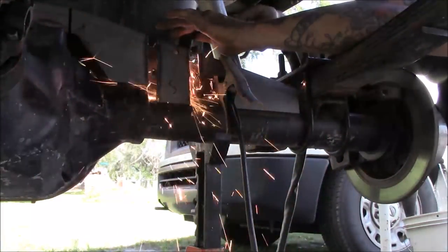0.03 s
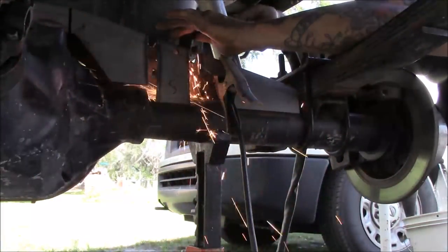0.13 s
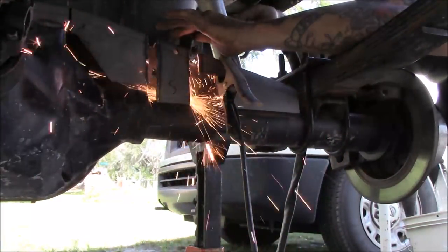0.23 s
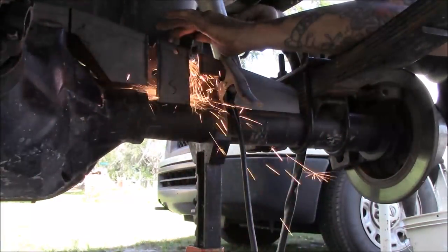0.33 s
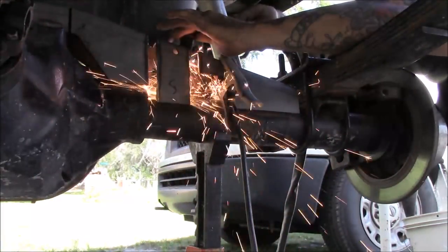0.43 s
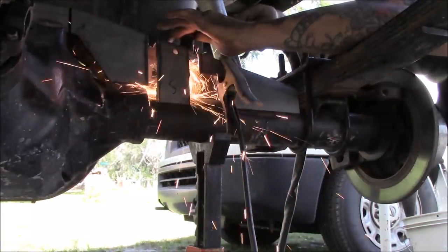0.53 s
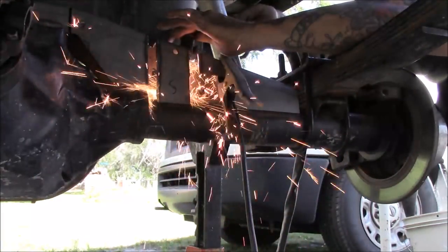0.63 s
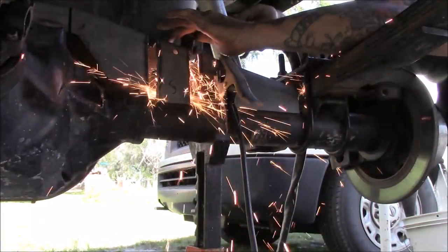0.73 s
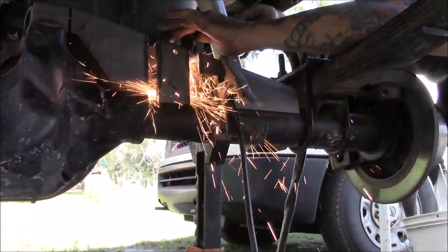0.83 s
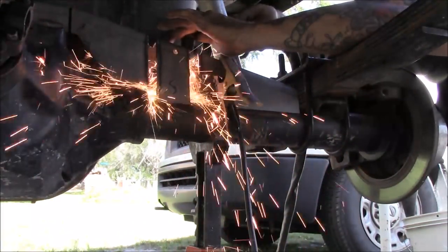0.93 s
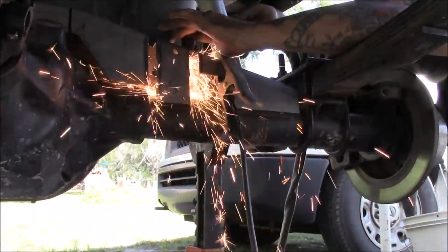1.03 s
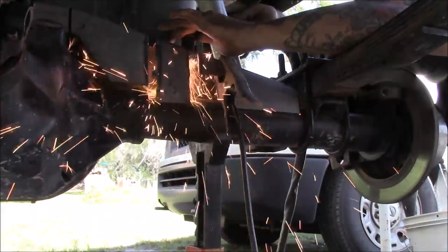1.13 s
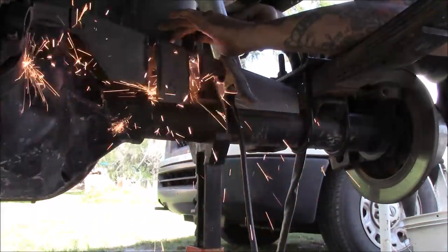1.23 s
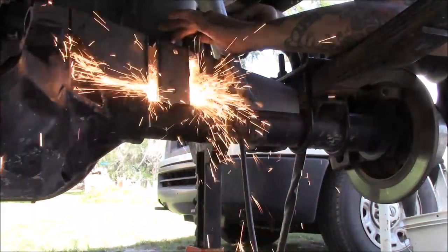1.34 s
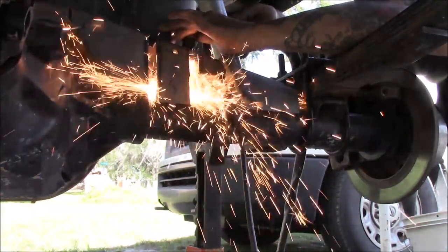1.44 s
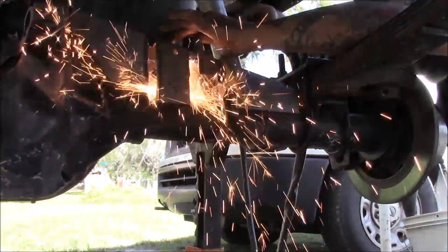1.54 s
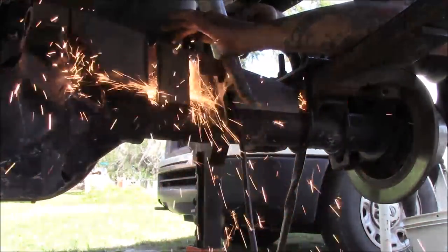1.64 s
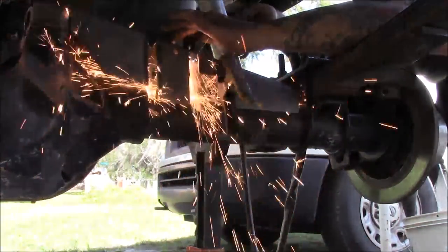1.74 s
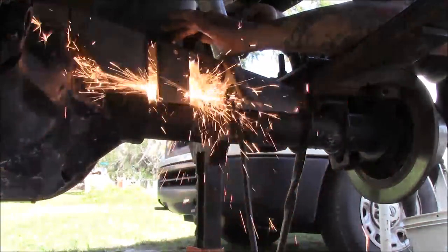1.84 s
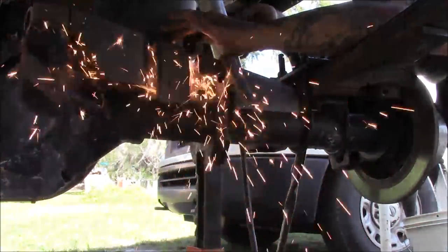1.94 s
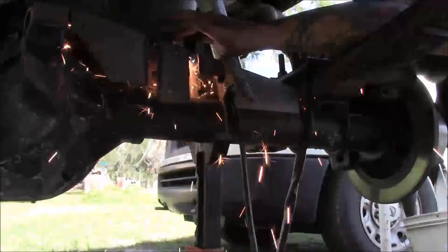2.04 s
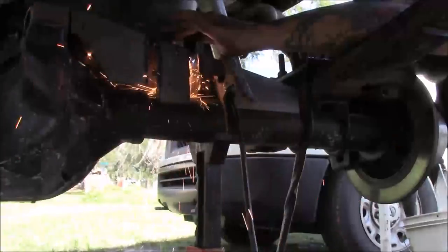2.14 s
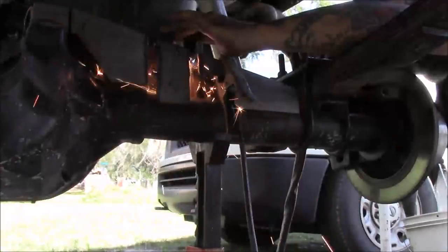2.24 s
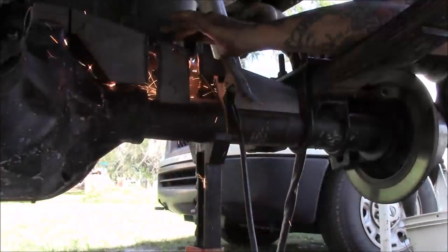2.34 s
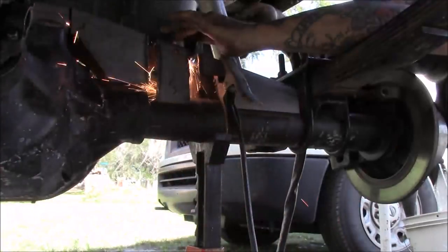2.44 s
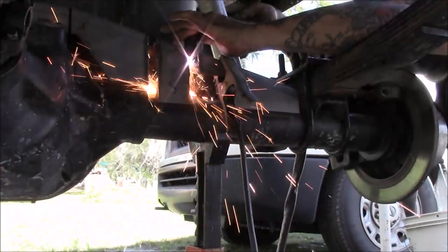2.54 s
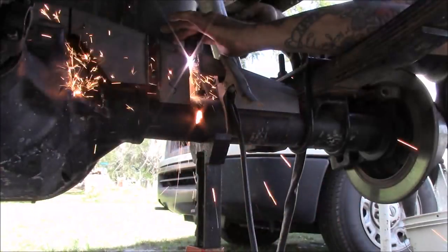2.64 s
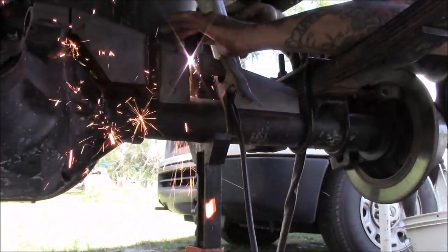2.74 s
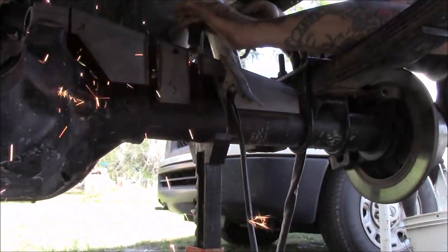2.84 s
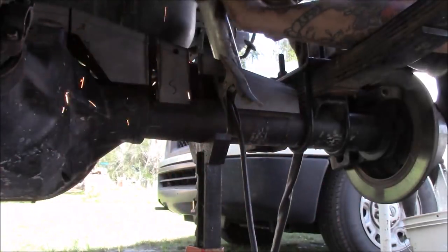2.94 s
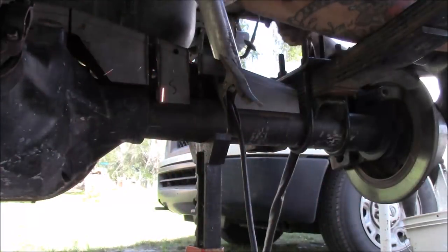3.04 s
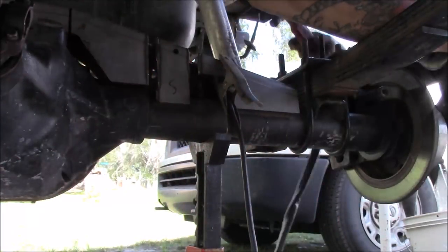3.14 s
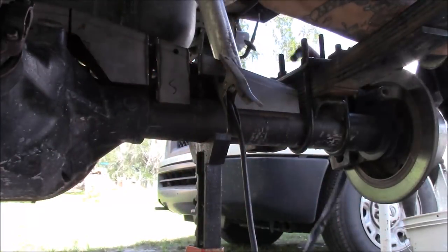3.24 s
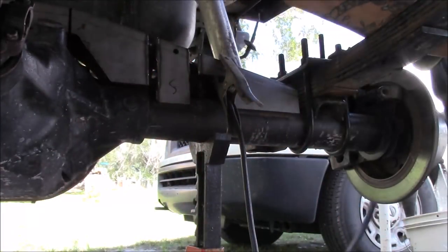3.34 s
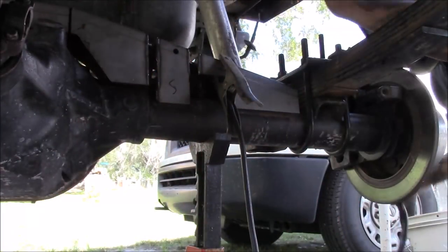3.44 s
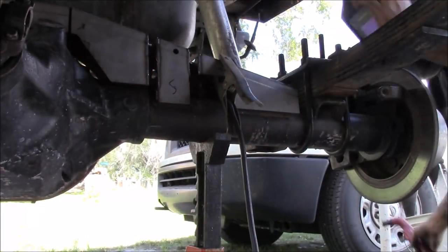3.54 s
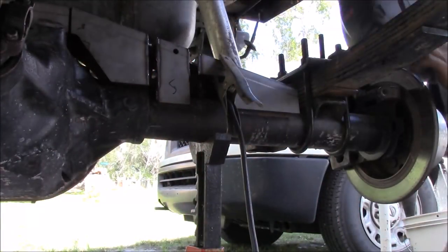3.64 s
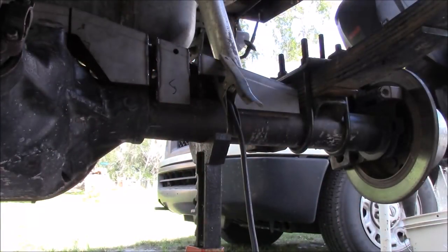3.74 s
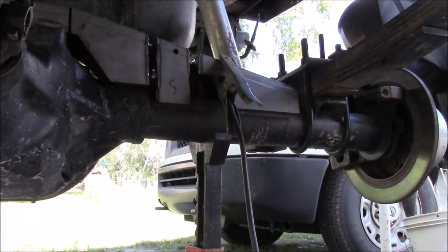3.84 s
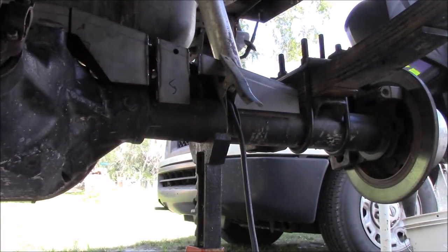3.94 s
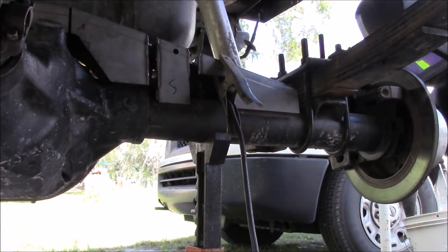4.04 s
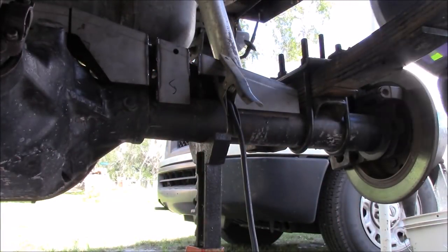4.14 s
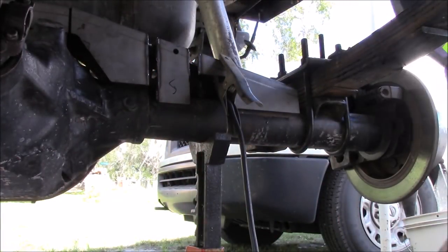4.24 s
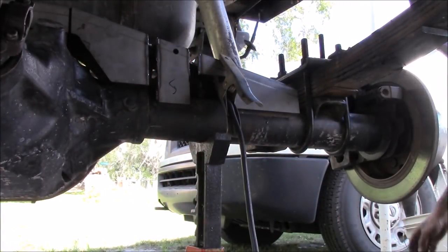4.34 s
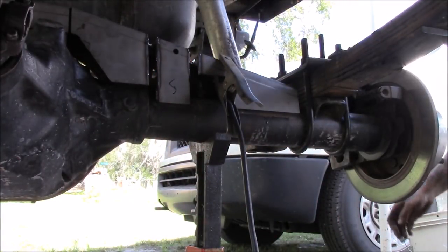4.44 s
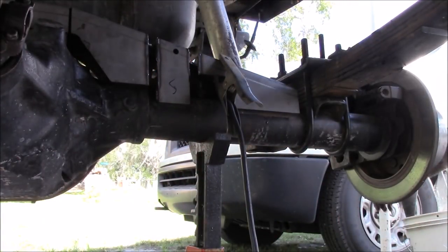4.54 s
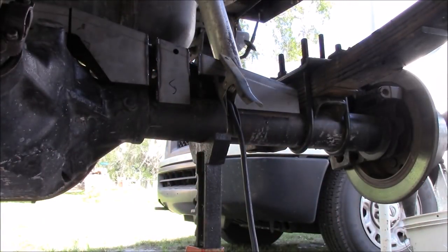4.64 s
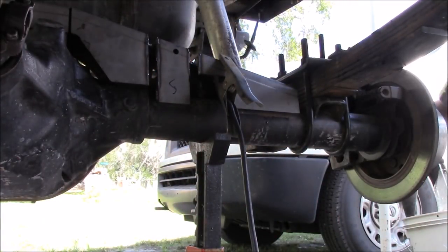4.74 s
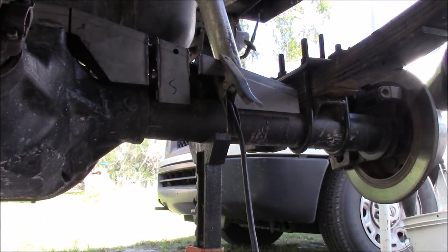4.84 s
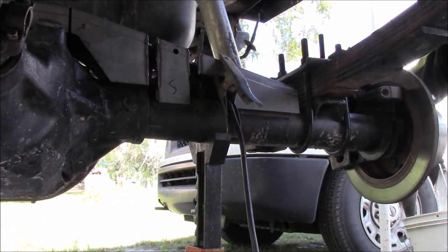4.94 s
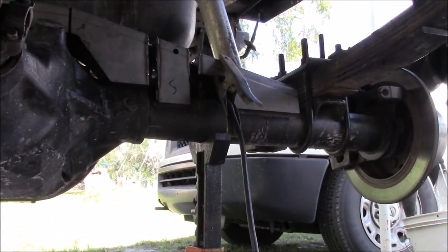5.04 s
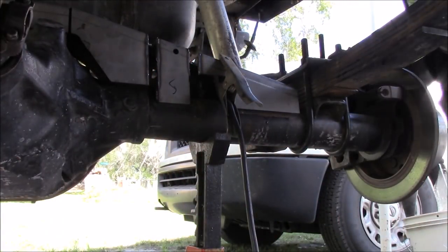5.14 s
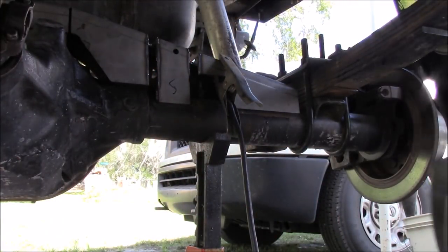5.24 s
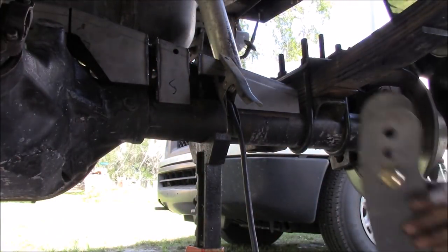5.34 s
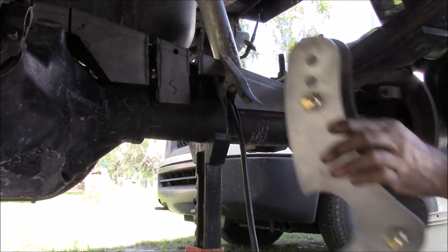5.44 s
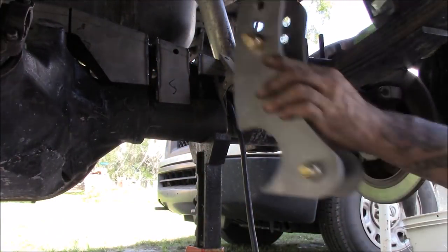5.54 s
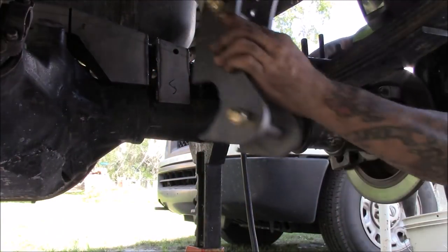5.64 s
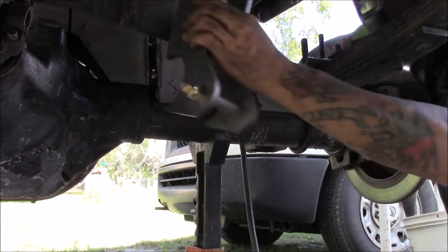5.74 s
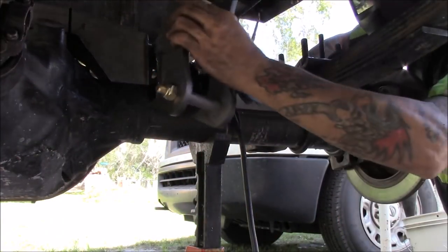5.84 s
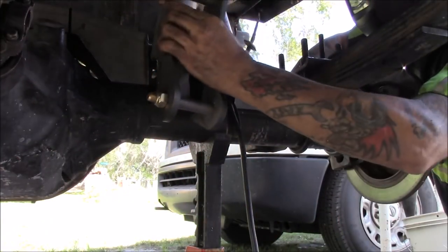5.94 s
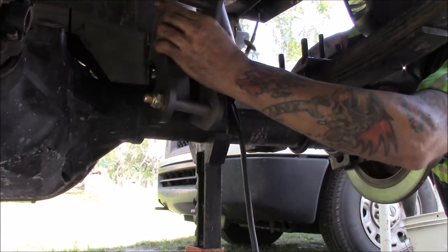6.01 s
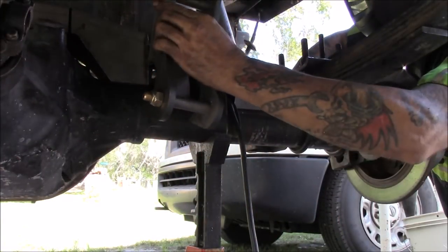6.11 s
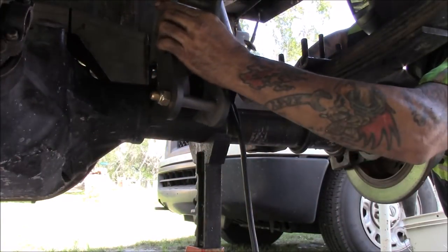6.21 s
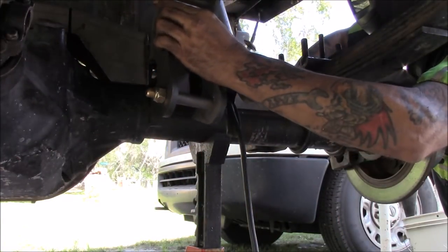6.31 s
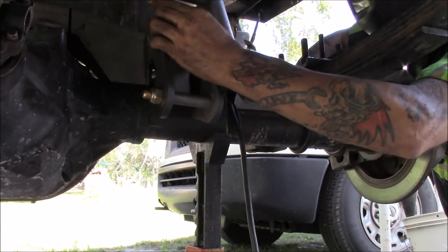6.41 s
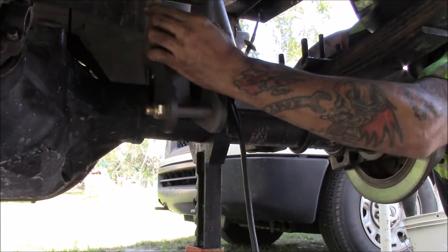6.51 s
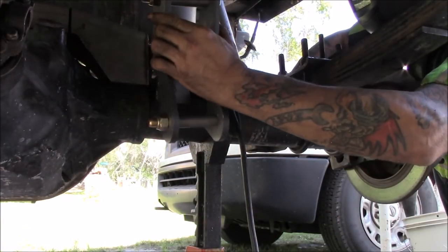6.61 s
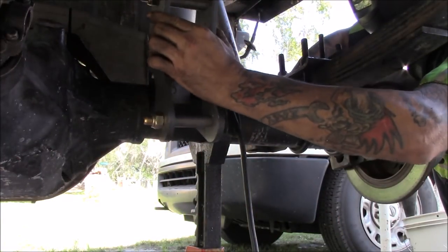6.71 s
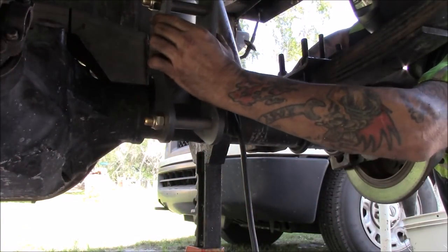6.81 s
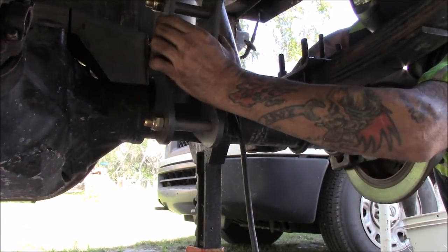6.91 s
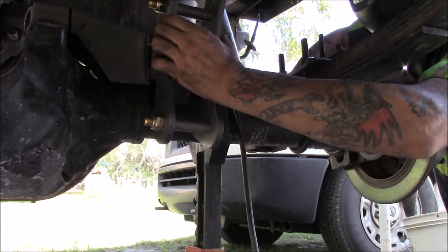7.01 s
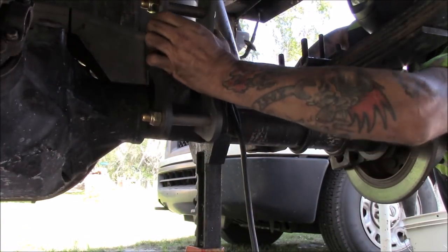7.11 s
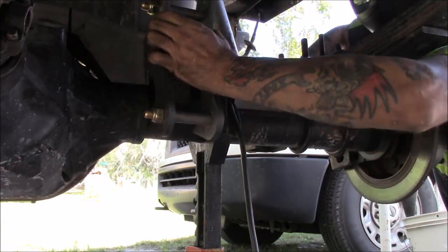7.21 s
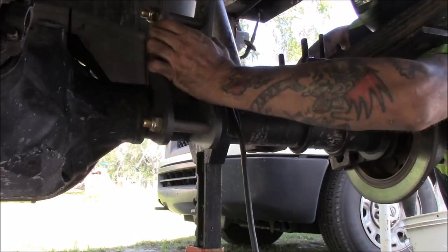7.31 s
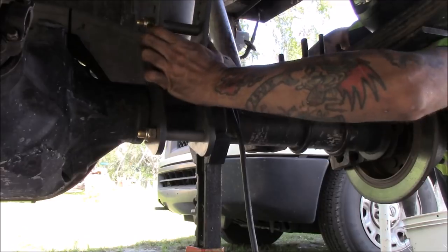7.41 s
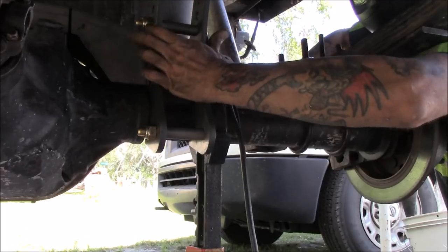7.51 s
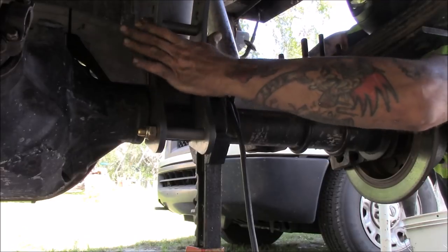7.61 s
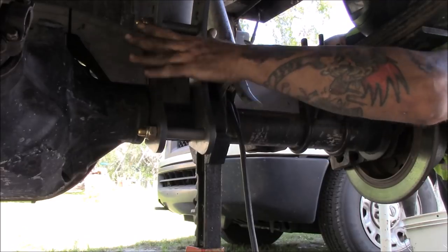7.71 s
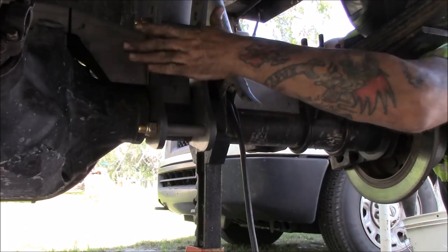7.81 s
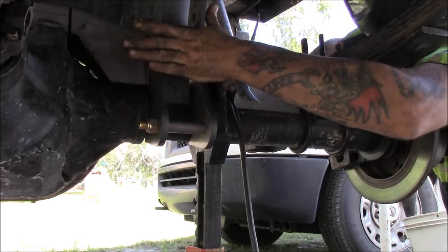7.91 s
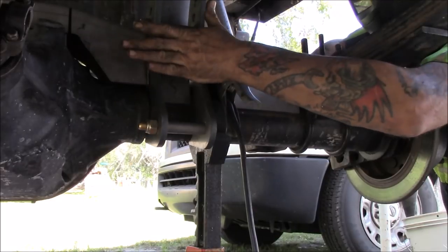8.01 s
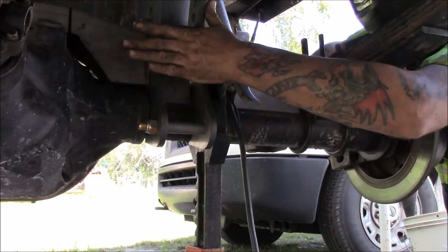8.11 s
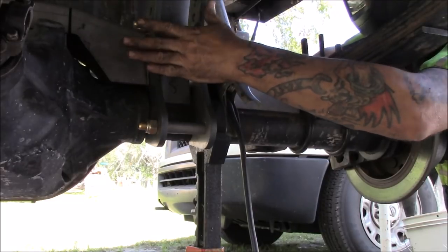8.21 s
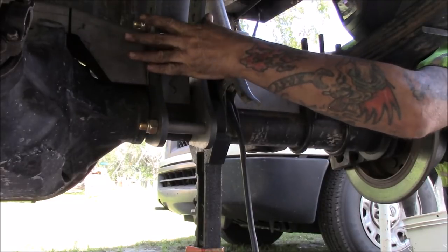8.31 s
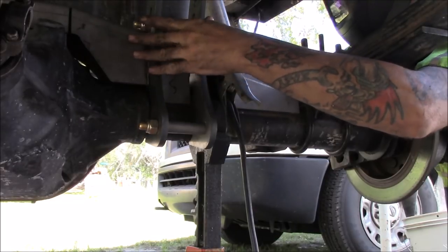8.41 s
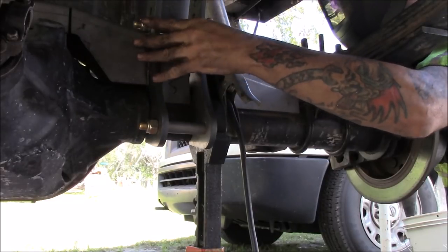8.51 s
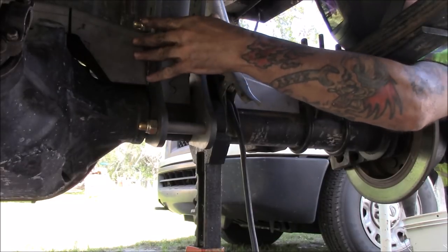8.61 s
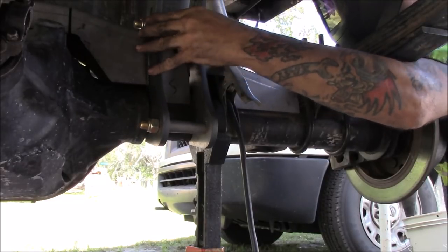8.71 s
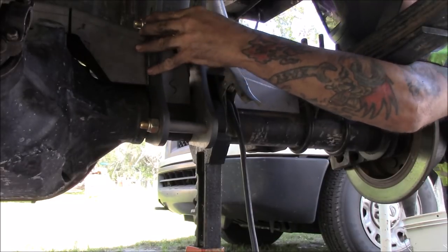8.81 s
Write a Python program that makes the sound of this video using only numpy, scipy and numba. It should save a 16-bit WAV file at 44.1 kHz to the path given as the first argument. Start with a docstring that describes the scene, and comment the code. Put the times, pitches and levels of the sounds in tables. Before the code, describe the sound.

Fierce crackling arc sizzle stops with a short pop, leaving airy hissing gas, followed by hard metallic knocks and scrapes beneath a truck.

```python
"""Arc torch and steel plate under a truck

Close by, an arc torch sizzles on a steel axle housing: noise and droplet bursts in resonant air.
It goes out with a short pop; its gas, flickering noise with a sweeping reflection, hisses on.
The nozzle drags and clinks over the steel, then the torch is laid on the ground.
A heavy steel plate is knocked into place against a bracket: decaying modes, cracks and clatter.
The camera's limiter ducks everything wherever the sum passes full scale."""
import sys
import numpy as np
from scipy import signal
from scipy.fft import rfft, irfft, next_fast_len
from scipy.io import wavfile
from scipy.ndimage import uniform_filter1d, minimum_filter1d
from numba import njit

SR = 44100
rng = np.random.default_rng(int(sys.argv[2]) if len(sys.argv) > 2 else 0)


def log_audio(samples):
    """Write samples as a 16-bit WAV file to the path given in sys.argv[1]."""
    # one column per channel
    frames = np.atleast_2d(samples).T
    # limit to full scale, then quantise
    limited = np.clip(frames, -1, 1)
    pcm = np.round(limited * 32767).astype(np.int16)
    wavfile.write(sys.argv[1], SR, pcm)


N = 390714
TIME = np.arange(N) / SR  # s
RING_SIZE = 22050  # samples in one ring, half a second
ARC_OUT_S, ARC_FADE_S = 2.811, 0.0093

# air resonances between torch, bracket and axle tube: (centre [Hz], width [Hz], lift [dB])
AIR_CAVITY = [(800, 75, 6), (1380, 134, 14.5), (1526, 62, 8), (2190, 85, 8), (2690, 230, 6.5),
              (2976, 210, 9), (4570, 160, 5), (5110, 120, 3.5), (6400, 200, 1.5), (7250, 270, 4),
              (7920, 110, 2.5), (8830, 210, 6.5), (9020, 150, -8), (10420, 160, 2), (11070, 140, 1.5)]


def undb(db):
    """Decibels to an amplitude factor."""
    return 10 ** (np.asarray(db) / 20)


def unit(x):
    """Scale to an RMS of 1."""
    return x / np.sqrt(np.mean(x ** 2))


def curves(table):
    """The columns of a table, joined by straight lines in time."""
    s, *columns = np.transpose(table)
    return [np.interp(TIME, s, c) for c in columns]


def add(out, start_s, x):
    """Mix x into out at a given time."""
    i = int(start_s * SR)
    out[i:i + len(x)] += x[:max(len(out) - i, 0)]


def hump(at_s, half_s):
    """A smooth rise to 1 and back."""
    return np.exp(-((TIME - at_s) / half_s) ** 2)


def ease(at_s, ease_s):
    """A smooth step from 0 to 1."""
    return .5 + .5 * np.tanh((TIME - at_s) / (2 * ease_s))


def walk(rate, size=N):
    """Random wander: normal draws, rate of them a second, joined by straight lines."""
    knots = rng.standard_normal(8192)
    return np.interp(TIME[:size] * rate, np.arange(len(knots)), knots)


def colour(x, points, resonances=()):
    """Filter by a (Hz, dB) outline with resonant humps or dips on top."""
    size = next_fast_len(len(x))
    f = np.fft.rfftfreq(size, 1 / SR) + 1  # 1 Hz up, to keep the logarithm finite
    hz, db = np.transpose(points)
    gain_db = np.interp(np.log(f), np.log(hz), db)
    for centre, width, lift in resonances:
        gain_db = gain_db + lift / (1 + (2 * (f - centre) / width) ** 2)
    return irfft(rfft(x, size) * undb(gain_db), size)[:len(x)]


def band(x, lo_hz, hi_hz, order=3):
    """Band-pass."""
    edges = [lo_hz, min(hi_hz, SR / 2 - 1000)]
    return signal.sosfilt(signal.butter(order, edges, "band", fs=SR, output="sos"), x)


def echo(x, lag_ms):
    """A reflection whose path may change."""
    return np.interp(TIME - lag_ms / 1000, TIME, x)


def jet(x, mid_db, low_db, top_db, flutter_db):
    """Split a jet into large, middle and fine eddies, each with its own level and flutter."""
    size = next_fast_len(N)
    spectrum = rfft(x, size)
    f = np.fft.rfftfreq(size, 1 / SR)
    low = 1 / (1 + (f / 3900) ** 8)
    top = 1 - 1 / (1 + (f / 11800) ** 20)
    out = 0
    for share, db in ((low, low_db), (1 - low - top, mid_db), (top, top_db)):
        eddies = unit(irfft(spectrum * share, size)[:N])
        out = out + eddies * undb(db + flutter_db * walk(45))
    return out


def ring(modes, scatter_db=4.0, rise_s=0.00073, detune_hz=3):
    """Decaying modes; grip and contact shift their strength and pitch a little from blow to blow."""
    t = TIME[:RING_SIZE]
    out = 0
    for hz, db, t60 in modes:
        pitch_hz = hz + detune_hz * rng.standard_normal()
        wave = np.sin(2 * np.pi * (pitch_hz * t + rng.random()))
        strength = undb(db + scatter_db * rng.standard_normal())
        out = out + strength * wave * np.exp(-np.log(1000) * t / t60)
    return out * (1 - np.exp(-t / rise_s))


def arc_levels():
    """Sizzle, roar and fizz in dB: all three swell with each surge of molten steel."""
    # surges as molten steel is blown out:
    # (time [s], half length [s], swell [dB], extra fizz [dB], extra roar [dB])
    surges = [(.06, .15, 1.3, 2.2, -1), (.36, .1, 1.3, 1, 2), (.66, .12, 1.7, 1.5, 1.2),
              (.86, .1, 2.4, 1.5, -.5), (1.24, 0.096, 2, .5, -1), (1.44, .13, 4.7, 1.3, 1.2),
              (1.59, .04, 1.4, 1, 1.2), (2.125, .17, 1.6, 3, .6), (2.652, .06, 2.4, 6, 1.8)]
    sizzle_db, roar_db, fizz_db = -20.2, -27.4, -26.4  # between the surges
    swell, spray, roar = sum(np.outer(lifts_db, hump(s, half_s)) for s, half_s, *lifts_db in surges)
    return sizzle_db + swell, roar_db + swell + roar, fizz_db + swell + spray


def steel_faces(x):
    """Many near reflections comb the hiss; the combs drift as the hand moves the torch."""
    lags_ms = np.linspace(1.8, 9, 12) + rng.uniform(-.3, .3, 12)
    return x + .17 * sum(echo(x, lag_ms + .035 * walk(1.3)) for lag_ms in lags_ms)


def arc(spatter_per_s=2600, spatter_db=-6, spread_db=2.0, sputter_db=0.5):
    """Turbulent gas and bursting metal droplets sound in the steel corner until the arc goes out."""
    # colour of the arc: (frequency [Hz], level [dB])
    outline = [(40, -43), (100, -20), (250, -10), (600, -7), (1050, -9), (1800, -7), (3700, -6),
               (7500, -1.5), (10500, -1), (13000, -9.5), (15500, -15.5)]
    sizzle_db, roar_db, fizz_db = arc_levels()
    sizes = undb(spread_db * np.minimum(rng.exponential(size=N), 5)) * rng.choice([-1, 1], N)
    droplets = unit(sizes * (rng.random(N) < spatter_per_s / SR))
    source = rng.standard_normal(N) + undb(spatter_db) * droplets
    source = source * undb(sputter_db * walk(260))
    # only short waves bounce off the small faces
    fine = signal.sosfiltfilt(signal.butter(2, 3500, "high", fs=SR, output="sos"), source)
    source = source - fine + steel_faces(fine)
    sound = jet(colour(source, outline, AIR_CAVITY), sizzle_db, roar_db, fizz_db, flutter_db=0.94)
    return sound * np.exp(-np.maximum(TIME - ARC_OUT_S, 0) / ARC_FADE_S)


def gas_levels():
    """Hiss, rush and fizz in dB: muffled in the cut, free in the hand, louder against the ground."""
    # torch in the hand: (hiss [dB], low rush [dB], top fizz [dB])
    held_db = (-32.9, -41.5, -35.8)
    # torch on the ground: (hiss [dB], low rush [dB], top fizz [dB])
    lying_db = (-27.9, -33, -30.5)
    laid = ease(at_s=4.08, ease_s=0.099)
    # muffled until the nozzle is drawn out of the cut
    muffle_db = -3.5 * (1 - ease(at_s=2.98, ease_s=.02))
    hiss, rush, fizz = (held + (lying - held) * laid + muffle_db
                        for held, lying in zip(held_db, lying_db))
    # fine fizz is beamed at the camera as the nozzle swings past
    swing_db = 6 * hump(at_s=3.2, half_s=.1)
    return hiss, rush, fizz + swing_db


def gas(reflection=.3, near_m=.09, far_m=.33, sound_m_per_s=343):
    """The bare jet: a reflection sweeps with its distance to a surface; close up, the gap resonates."""
    # colour of the gas jet: (frequency [Hz], level [dB])
    outline = [(25, -30), (60, -15), (120, -5.5), (240, 0), (500, -6.5), (1000, -6.5), (2300, -4),
               (4000, -2), (5100, -4.5), (7000, 1.5), (10000, 1.5), (13500, 9.5), (15500, 5)]
    # resonances of the gap under the torch: (centre [Hz], width [Hz], lift [dB])
    gap_modes = [(495, 290, 7.5), (804, 56, 7), (1310, 300, 6.5), (1580, 110, 5.5), (3600, 280, 2),
                 (6050, 180, 1.5), (7800, 450, -1), (9350, 160, 1.5), (11430, 380, -4.5)]
    # the nozzle leaves the steel and sinks to the ground: (time [s], gap to the nearest surface [m])
    nozzle_path = [(2.8, .075), (3.3, 0.37), (3.7, .185), (4.2, .09)]
    hiss_db, rush_db, fizz_db = gas_levels()
    gap_m, = curves(nozzle_path)
    bounce_ms = 2000 * gap_m / sound_m_per_s  # there and back
    closeness = np.clip(np.log(far_m / gap_m) / np.log(far_m / near_m), 0, 1)
    source = rng.standard_normal(N)
    source = source + 0.15 * sum(echo(source, lag_ms) for lag_ms in (4.3, 7.1, 11.3))
    free = colour(source + reflection * echo(source, bounce_ms), outline)
    close = colour(source, outline, gap_modes)
    mix = (1 - closeness) * free + closeness * close
    sound = jet(mix, hiss_db, rush_db, fizz_db, flutter_db=0.63)
    return sound * np.clip((TIME - ARC_OUT_S) / ARC_FADE_S + 1, 0, 1)


def pop(level_db=-13, decay_s=0.0097, lead_s=0.003):
    """The breaking arc gives one short puff into the same corner."""
    # colour of the puff: (frequency [Hz], level [dB])
    outline = [(40, -38), (150, -16), (450, -8), (800, 0), (1400, -5), (3000, -10), (6000, -25)]
    age = TIME - (ARC_OUT_S - lead_s)
    envelope = (age > 0) * np.exp(-np.abs(age) / decay_s)
    puff = colour(rng.standard_normal(N) * envelope, outline, AIR_CAVITY)
    return undb(level_db) * unit(puff) * np.std(envelope)


def drag(start_s=2.825, attack_s=.03, hold_s=.28, release_s=.035, level_db=-35.5, judder_db=1.5):
    """The nozzle judders over the rough cut, bites once and sounds the corner beside it."""
    # colour of the scrape: (frequency [Hz], level [dB])
    outline = [(100, -43), (400, -6.5), (800, -1.5), (1500, -12), (2200, -12), (6000, -17)]
    age = TIME - start_s
    envelope = np.clip(age / attack_s, 0, 1) * np.exp(-np.maximum(age - hold_s, 0) / release_s)
    bite_db = 5.5 * hump(at_s=2.975, half_s=0.03)
    scrape = unit(colour(rng.standard_normal(N), outline, AIR_CAVITY))
    return scrape * envelope * undb(level_db + bite_db + judder_db * walk(120))


def clink(at_s=2.998, tick_db=-24, tick_decay_s=0.024):
    """The nozzle clips the steel as the torch is pulled away: a noisy tick and its ringing modes."""
    # modes of the torch nozzle: (frequency [Hz], level [dB], t60 [s])
    nozzle = [(2013, -31, .4), (3047, -32, .23), (7450, -30, .07)]
    out = np.zeros(N)
    tick = unit(band(rng.standard_normal(RING_SIZE), 840, 9100))
    tick = tick * np.exp(-TIME[:RING_SIZE] / tick_decay_s)
    add(out, at_s, undb(tick_db) * tick + ring(nozzle))
    return out


def crack(hardness_hz, crack_db=-2, decay_s=0.0052, bright_hz=4200):
    """The first touch: a few milliseconds of bright click, stronger the harder the contact."""
    click = unit(band(rng.standard_normal(RING_SIZE), 1700, 7200, order=2))
    click = click * np.exp(-TIME[:RING_SIZE] / decay_s)
    return undb(crack_db) * (hardness_hz / bright_hz) ** 2 * click


def clatter(hardness_hz, push_cycles=2.5, chatter_db=2.0):
    """Close modes of the underbody as noise bands; soft contacts push longer and miss the treble."""
    # dense ring of the underbody: (frequency [Hz], level [dB], t60 [s], build-up [s])
    underbody = [(66.4, -27.5, 0.39, 0.017), (120, -26, 0.5, .02), (241, -11, 0.31, 0.0098),
                 (475, -9, 0.23, 0.0062), (884, -3, 0.2, 0.00081), (1410, -4.5, 0.17, 0.00084),
                 (2680, -1.5, 0.15, 0.002), (3600, -1, 0.1, 0.00044), (6840, -1, .08, .001)]
    t = TIME[:RING_SIZE]
    out = 0
    for hz, db, t60, rise_s in underbody:
        grain = unit(band(rng.standard_normal(RING_SIZE), hz / np.sqrt(2), hz * np.sqrt(2)))
        contact = 1 / np.hypot(1, (hz / hardness_hz) ** 2)
        swell = 1 - np.exp(-t / (rise_s + push_cycles / hardness_hz))
        out = out + undb(db) * contact * grain * swell * np.exp(-np.log(1000) * t / t60)
    # the rough faces chatter against each other
    return out * undb(chatter_db * walk(336, size=RING_SIZE))


def soften(modes, hardness_hz):
    """A soft contact misses the modes above its hardness."""
    return [(hz, db - 10 * np.log10(1 + (hz / hardness_hz) ** 4), t60) for hz, db, t60 in modes]


def favour(modes, spot_hz, slope_db=7):
    """The contact spot drives the modes near one pitch best; the rest fall off by the octave."""
    return [(hz, db - slope_db * abs(np.log2(hz / spot_hz)), t60) for hz, db, t60 in modes]


def touch(hardness_hz, plate_db, bracket_db, housing_db, spot_hz, bear_s):
    """One contact: crack, clatter and the rings of the three parts, rising as the parts bear."""
    # modes of the loose plate: (frequency [Hz], level [dB], t60 [s])
    plate_modes = [(861, -6, 0.23), (1010, -18, 0.19), (1080, -8, 0.38), (1350, 3.5, 0.077),
                   (2012, -20, 0.29), (2260, -0.5, 0.17), (2292, 0, 0.3), (2465, -3, 0.2), (2950, -9, 0.15)]
    # modes of the bracket: (frequency [Hz], level [dB], t60 [s])
    bracket_modes = [(859, -2.5, 0.25), (1009, -2.5, 0.23), (1143, 2.5, 0.19), (1440, -3, 0.15),
                     (1548, -1.5, 0.16), (1645, 0, 0.28), (1760, -5.5, 0.28), (2940, 0, 0.15),
                     (3460, -17, 0.14)]
    # modes of the axle housing: (frequency [Hz], level [dB], t60 [s])
    housing_modes = [(213, -0.5, 0.44), (233, 2.5, 0.23), (338, -3.5, 0.16), (401.5, -6, 0.32),
                     (520, 0, 0.28), (679, -4, 0.15), (780, 3.5, 0.09), (884, -18, 1), (960, -8, .2),
                     (1102, -3.5, 0.17), (1316, -9, 0.14)]
    plate = undb(plate_db) * ring(soften(plate_modes, hardness_hz))
    bracket = undb(bracket_db) * ring(soften(bracket_modes, hardness_hz))
    housing = undb(housing_db) * ring(favour(housing_modes, spot_hz), rise_s=0.0012)
    sound = crack(hardness_hz) + clatter(hardness_hz) + plate + bracket + housing
    return sound * (1 - np.exp(-TIME[:RING_SIZE] / bear_s))


def blow(hardness_hz, contact, settle_s=.038, settle_scatter=.15, hardness_kept=.7):
    """Steel meets steel, then rocks and settles with a second, weaker and duller touch."""
    # where a blow lands, levels against its strength: (plate ring [dB], bracket ring [dB],
    # housing ring [dB], housing pitch favoured [Hz], time to bear on [s], settling touch [dB])
    contacts = { "plate": (2.5, -8, -12, 300, .0004, -12), "bracket": (-8, -1.5, -22, 1100, .0012, -8),
                "wedged": (-14, -8, -1, 950, .005, -10), "housing": (-20, -15, -3.5, 880, .001, -11),
                "grazing": (1, -1, -7, 1100, .008, -1), "sliding": (-20, -21, -3.5, 650, .004, -17)}
    *kind, settle_db = contacts[contact]
    out = touch(hardness_hz, *kind)
    gap_s = settle_s * np.exp(settle_scatter * rng.standard_normal())
    add(out, gap_s, undb(settle_db) * touch(hardness_kept * hardness_hz, *kind))
    return out


def knocks(tail_db=-22, tail_t60_s=0.92):
    """Steel on steel: each blow rings plate, bracket and housing, and lingers faintly under the truck."""
    # knocks: (time [s], strength [dB], hardness [Hz], where it lands)
    strikes = [ (5.977, -8, 4360, "plate"), (6.058, -19, 3300, "sliding"), (6.236, -14.5, 2200, "plate"),
               (6.249, -14.5, 3100, "plate"), (6.277, -17, 2900, "plate"), (6.379, -18, 900, "sliding"),
               (6.450, -23.5, 1150, "sliding"), (6.637, -8, 3340, "bracket"),
               (6.755, -19.5, 2700, "grazing"), (6.827, -11.5, 1900, "sliding"),
               (6.902, -16.5, 1500, "sliding"), (7.015, -15.5, 2200, "wedged"),
               (7.138, -17, 3500, "wedged"), (7.170, -9.7, 2700, "wedged"), (7.223, -13, 450, "sliding"),
               (7.295, -21, 500, "sliding"), (7.380, -17.5, 910, "sliding"), (7.414, -9.5, 2200, "wedged"),
               (7.444, -7, 2100, "wedged"), (7.884, -4.5, 2920, "housing"), (7.949, -6.8, 1700, "housing"),
               (8.609, -18.3, 880, "sliding"), (8.712, -15.8, 700, "sliding")]
    out = np.zeros(N)
    for s, db, hardness_hz, contact in strikes:
        add(out, s, undb(db) * blow(hardness_hz, contact))
    # the knocks carry no deep bass
    out = band(out, 55, 14000)
    decay = np.exp(-np.log(1000) * TIME[:RING_SIZE] / tail_t60_s)
    tail = band(rng.standard_normal(RING_SIZE), 90, 2200, order=1) * decay
    lingering = unit(signal.fftconvolve(out, tail)[:N])
    return out + undb(tail_db) * np.std(out) * lingering


def widen(mid, width):
    """Scattered reflections reach the two microphones with unlike phases."""
    scatter = irfft(np.exp(2j * np.pi * rng.random(size=1025)))
    side = colour(signal.fftconvolve(mid, scatter)[:N], width)
    return np.array([mid + side, mid - side])


def scene(left_db=0.45):
    """The work is almost straight ahead; the low roar of the arc spreads widest."""
    # side against mid for the arc: (frequency [Hz], level [dB])
    arc_width = [(60, -19), (200, -3.5), (400, -1), (700, -4), (1300, -10), (4400, -30), (8000, -21.5),
                 (15000, -26)]
    # side against mid for the gas: (frequency [Hz], level [dB])
    gas_width = [(60, -12), (200, -22), (2000, -32), (8000, -17), (15000, -19)]
    # side against mid for pop, drag, clink and knocks: (frequency [Hz], level [dB])
    knock_width = [(60, -11), (110, -22), (250, -44), (4000, -33.5)]
    work = widen(arc(), arc_width) + widen(pop() + drag() + clink() + knocks(), knock_width)
    return work * undb([[left_db / 2], [-left_db / 2]]) + widen(gas(), gas_width)


@njit
def follow(x, release):
    """Peak follower: jumps up at once and sinks slowly."""
    out, e = np.empty(len(x)), 0.
    for i in range(len(x)):
        e = max(x[i], e * release)
        out[i] = e
    return out


def record(dry, ceiling_db=0.0, release_s=0.075, top_hz=15620):
    """The camera limits peaks above the ceiling, both channels together, and cuts the top."""
    peak = follow(np.abs(dry).max(axis=0), np.exp(-1 / (release_s * SR)))
    gain = np.minimum(1, undb(ceiling_db) / (peak + 1e-9))
    # hold and smooth the gain so that it begins to dip just ahead of a peak
    gain = uniform_filter1d(minimum_filter1d(gain, size=65), size=65)
    return signal.sosfilt(signal.ellip(12, .1, 80, top_hz, fs=SR, output="sos"), dry * gain)


dry = scene()
out = record(dry)
log_audio(out)
```